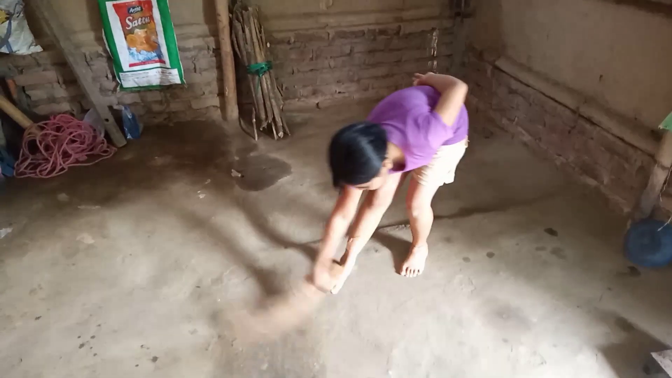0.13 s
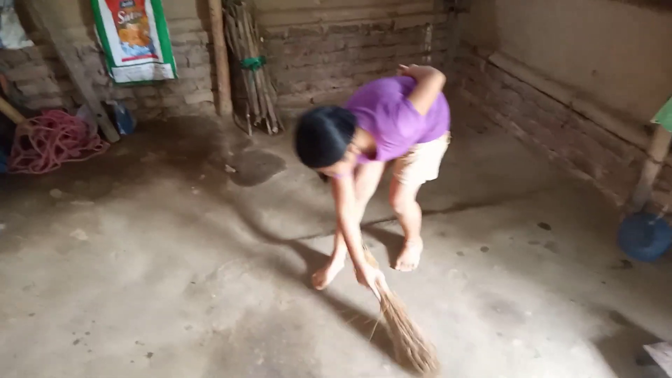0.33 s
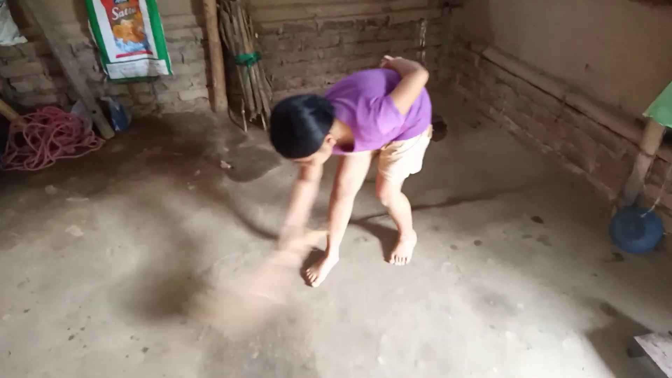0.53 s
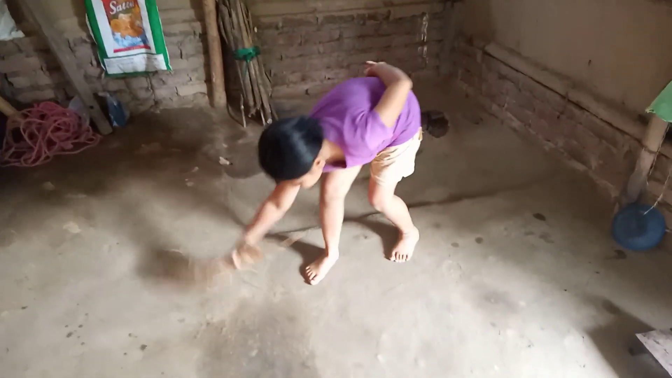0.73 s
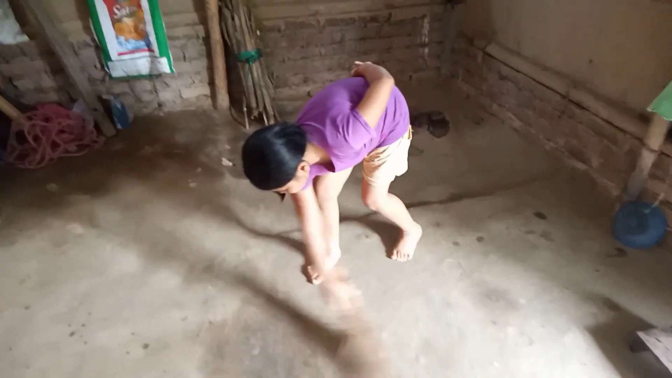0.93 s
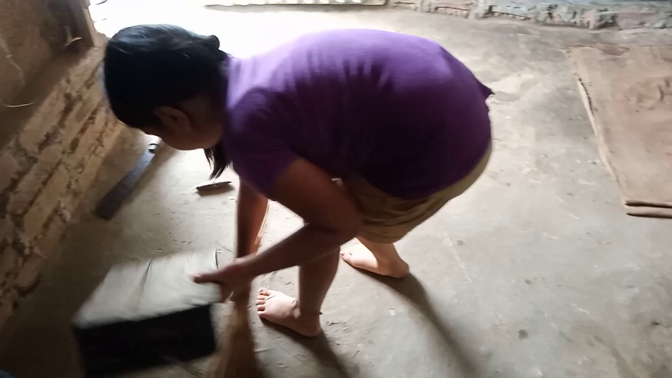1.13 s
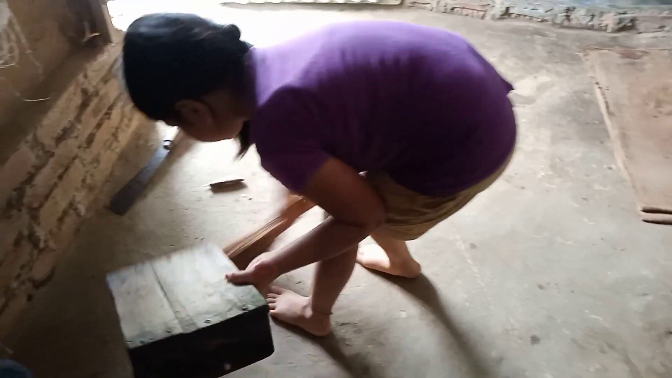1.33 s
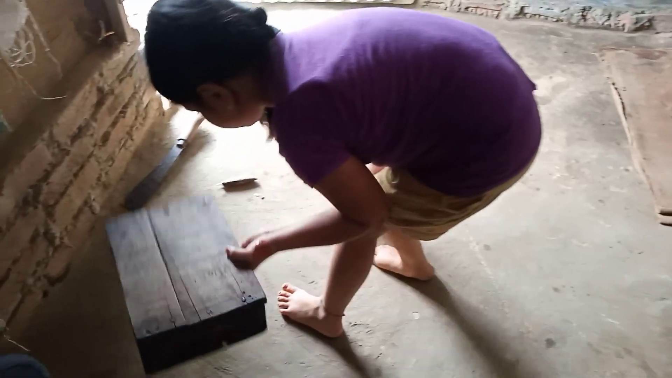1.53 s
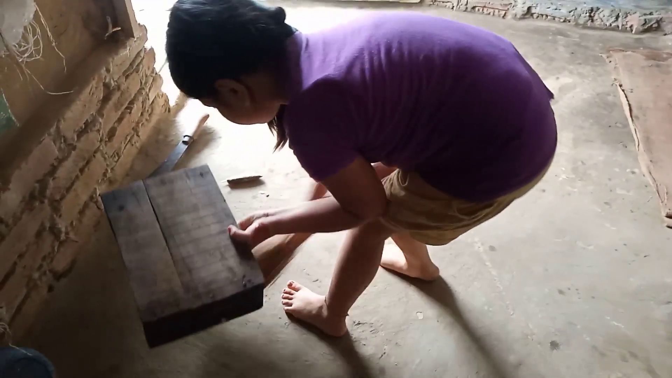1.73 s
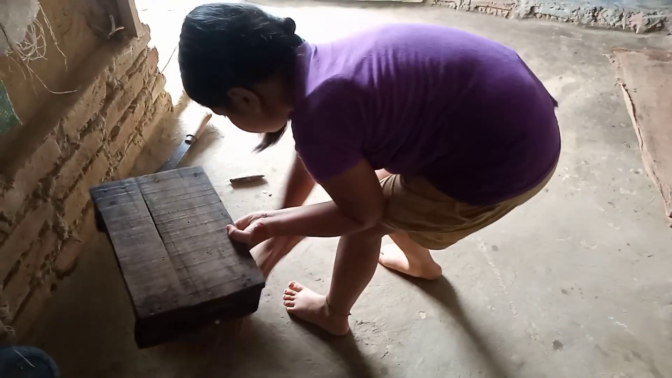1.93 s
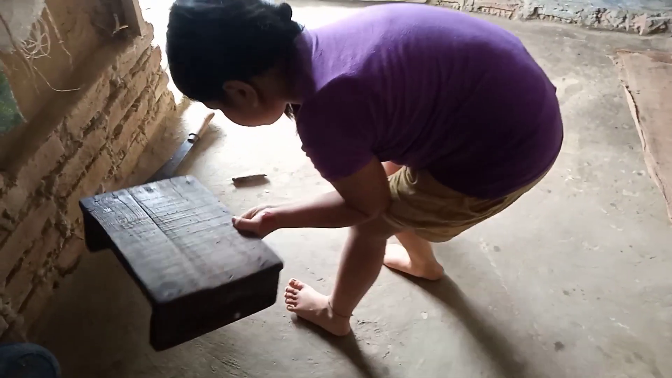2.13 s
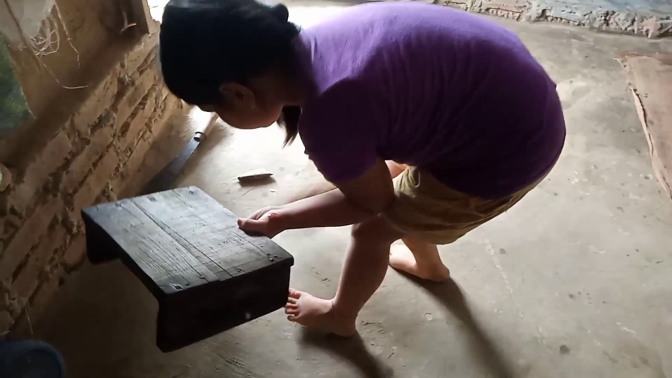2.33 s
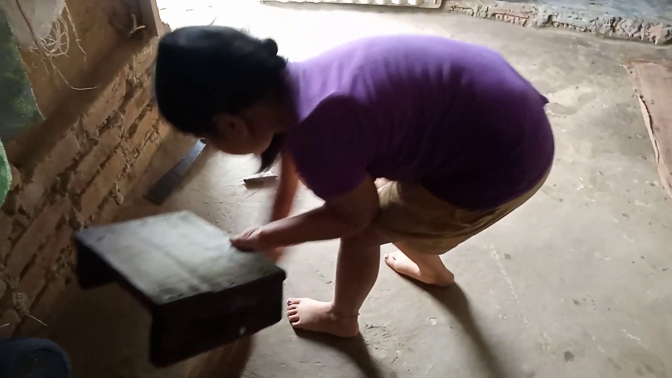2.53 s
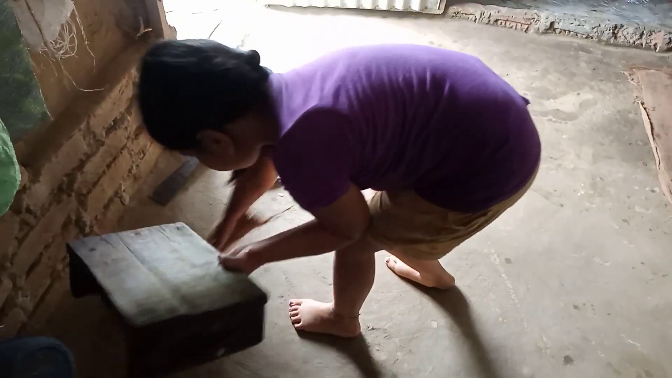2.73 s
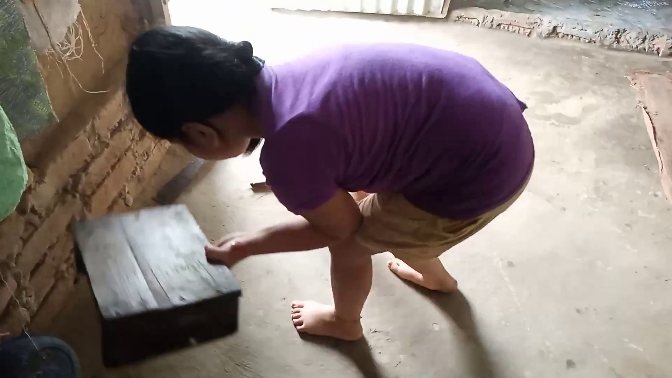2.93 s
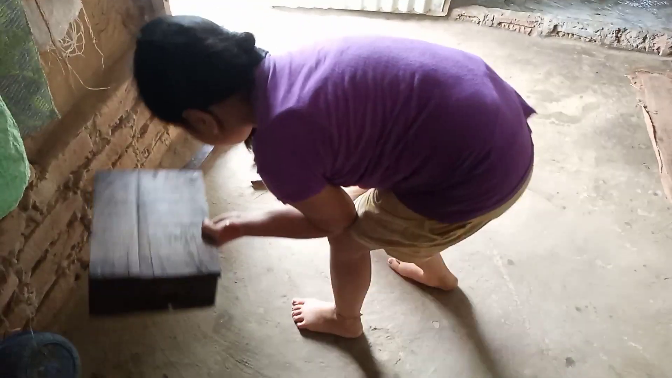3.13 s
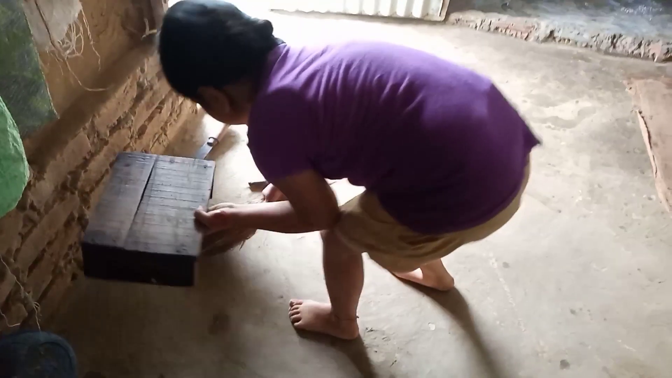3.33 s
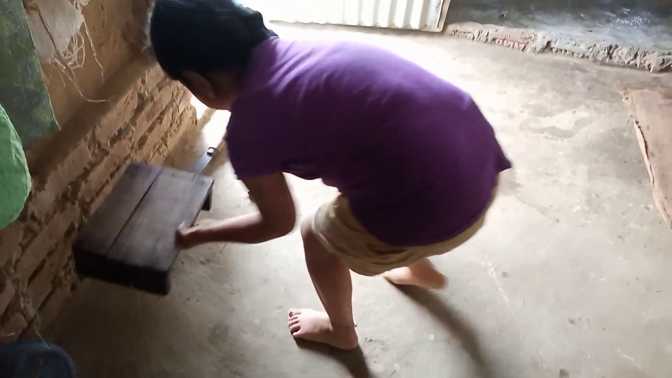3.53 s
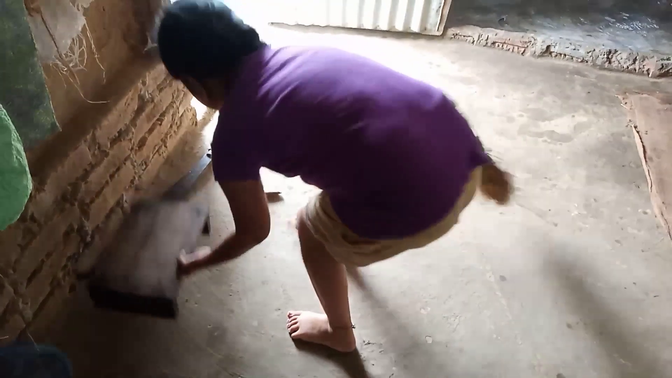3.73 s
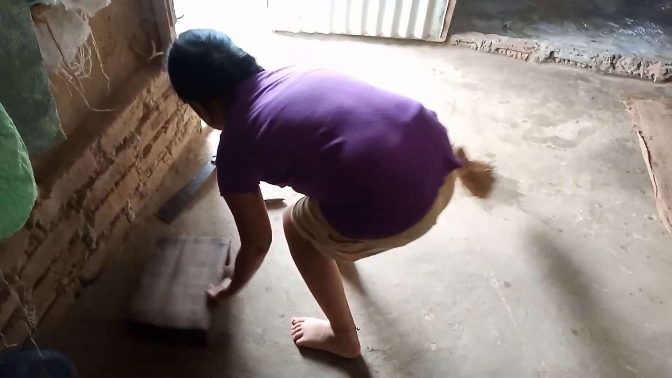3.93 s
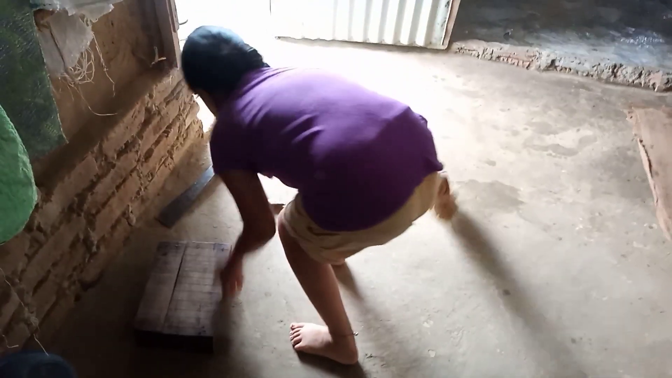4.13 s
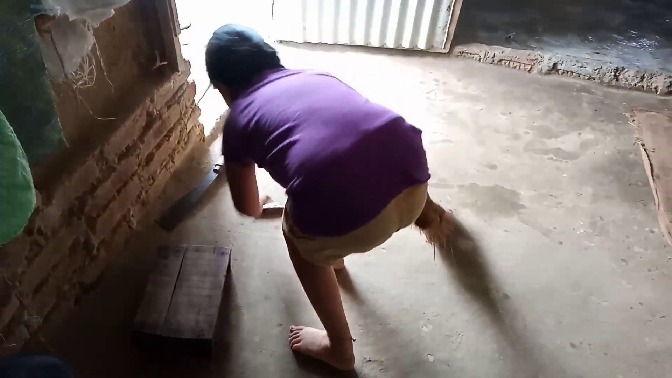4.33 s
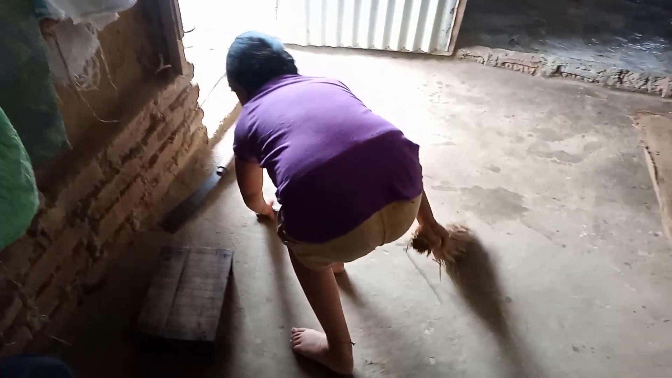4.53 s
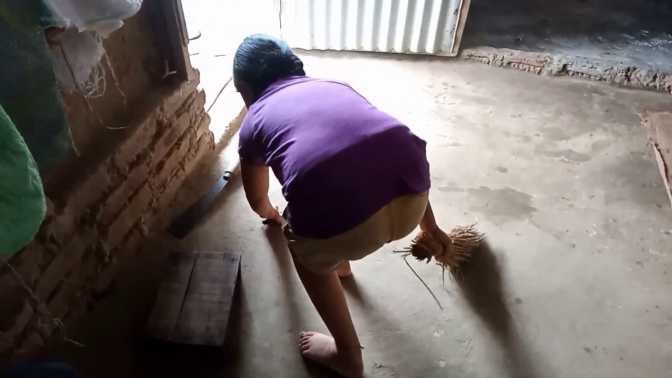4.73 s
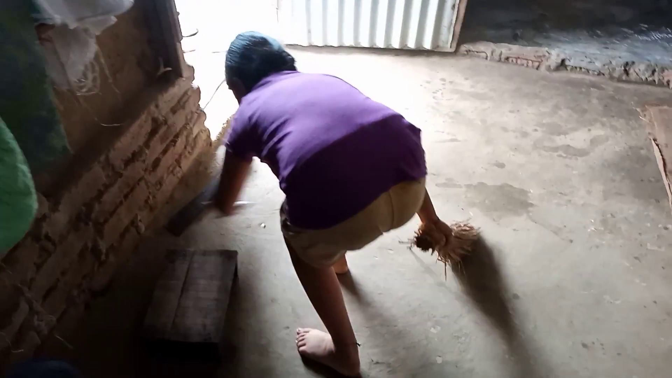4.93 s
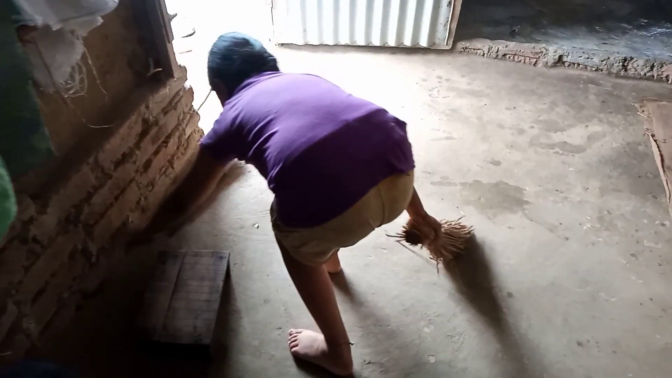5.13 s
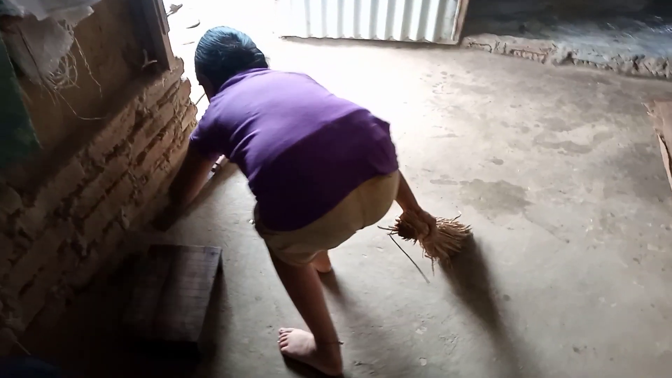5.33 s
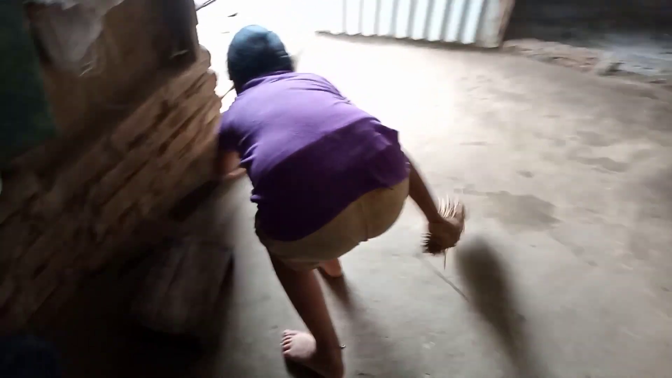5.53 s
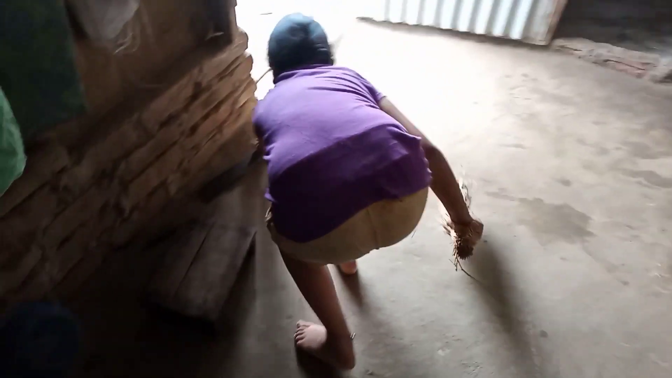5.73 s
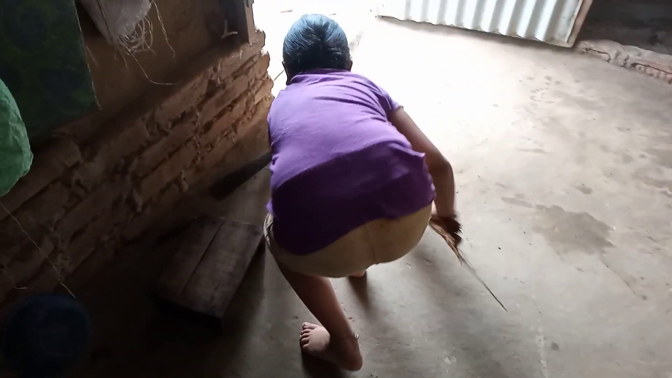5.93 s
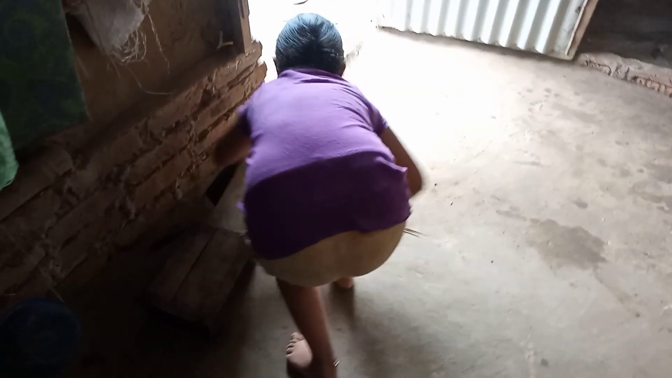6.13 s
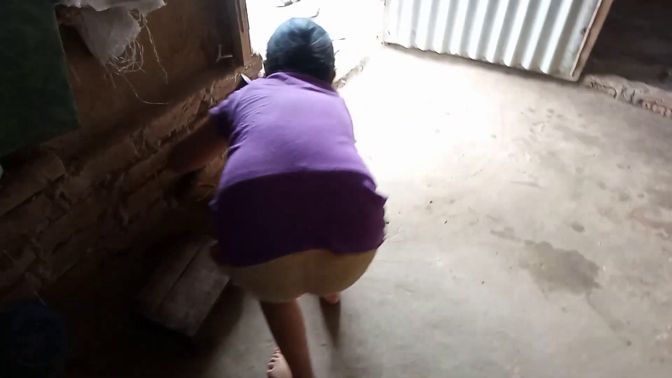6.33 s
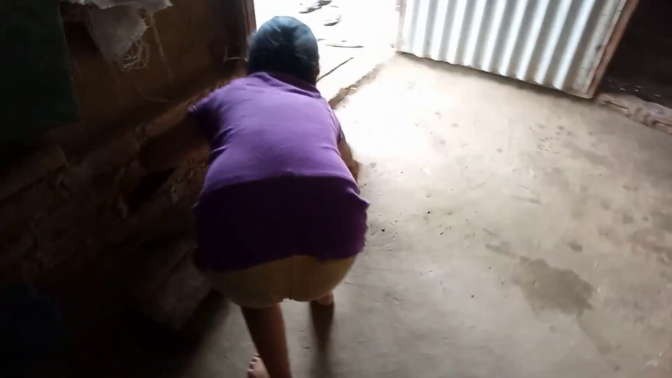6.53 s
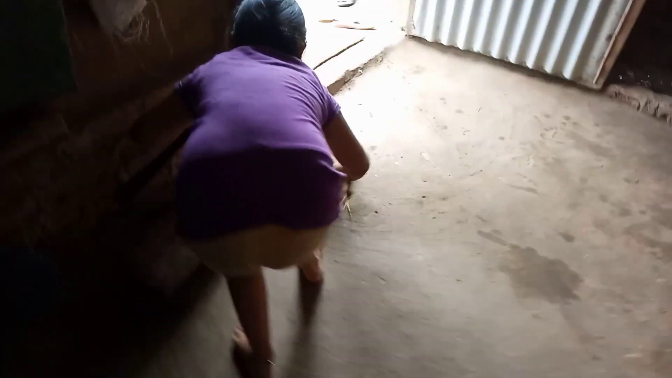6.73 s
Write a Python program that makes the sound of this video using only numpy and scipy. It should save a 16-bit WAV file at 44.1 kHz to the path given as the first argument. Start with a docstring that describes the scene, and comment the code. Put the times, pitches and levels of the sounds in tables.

```python
"""A short grass broom sweeps concrete in a small brick room: stalks slipping on grit, heard as dense random clicks.
Struck modes and filtered contacts give a wooden stool set down with a sharp double knock, bumps by the wall,
clicks and a clinking metal piece; bare feet shuffle in noise bursts and a sagging tone squeaks.
Gliding sines make a bird outside repeat three falling notes and fainter far calls, over coloured-noise air.
Early on the sound fades away, stays almost silent briefly and returns softer."""
import sys
import numpy as np
from scipy import signal
from scipy.fft import rfft, irfft
from scipy.io import wavfile
from scipy.ndimage import uniform_filter1d, map_coordinates

SR = 44100
rng = np.random.default_rng(int(sys.argv[2]) if len(sys.argv) > 2 else 0)


def wav_out(sig):
    """Save sig, one row per channel (or a flat mono array), as 16-bit PCM at SR to the path in sys.argv[1]."""
    wavfile.write(sys.argv[1], SR, np.round(np.clip(np.atleast_2d(sig).T, -1, 1) * 32767).astype(np.int16))


N = 303844
T = np.arange(N) / SR  # time [s]


def stalks(rate, spread_db):
    """Stick-slip friction: stalk tips slip on the grit in many tiny clicks and a few larger, rate per second."""
    slips = rng.random(N) < rate / SR
    sizes = undb(spread_db * np.minimum(rng.exponential(size=N), 5))
    return unit(slips * sizes * rng.standard_normal(N))


PRESS_POWER = 1.66  # the stalks bend softly at first, then bear down
SAG_DB_PER_S = 10  # the arm slows along the stroke
LIFT_DB, LIFT_POWER = 21.5, 1.44  # fall over the lift time [dB], faster as the last stalks leave


def pressure(s, press, hold, lift):
    """Contact force: the bundle is pressed down, drawn along while it slows, then lifted off."""
    drawn = np.maximum(T - s - press, 0)
    lifted = np.clip((drawn - hold) / lift, 0, 4)
    fall_db = SAG_DB_PER_S * np.minimum(drawn, hold) + LIFT_DB * lifted ** LIFT_POWER
    return np.clip((T - s) / press, 0, 1) ** PRESS_POWER * undb(-fall_db)


TIPS_DRIFT_DB, RASP_DRIFT_DB = 0.5, -10  # change of treble and of low rasp from touch to lift
# broom strokes and light grazes: (time [s], press [s], hold [s], lift [s], relative level [dB],
# mean treble against level [dB], mean low rasp against level [dB])
STROKES = [(0.0, 0.005, 0.098, 0.11, -57, -31, -5), (0.079, 0.11, 0.094, 0.22, -36.5, -17.5, -14.5),
           (0.498, 0.14, 0.099, .1, -58, -30, -25), (0.678, 0.054, .04, 0.13, -50.5, -21, -15),
           (0.763, 0.09, 0.11, 0.17, -38.5, -17, -11), (1.306, 0.055, .08, 0.15, -47.5, -27, -3),
           (1.389, 0.099, 0.046, 0.17, -42.5, -16.5, -3.5), (1.954, 0.021, .01, .12, -43, -19, -12),
           (2.017, 0.051, .11, 0.18, -40.5, -16.5, -12), (2.657, 0.065, .32, 0.18, -41, -16.5, -5.5),
           (3.144, 0.086, 0.012, 0.12, -52.5, -15, -30), (3.407, .035, 0.058, 0.15, -47, -21, -16.5),
           (3.465, 0.089, .03, 0.19, -44, -14.5, -30), (4.485, 0.081, 0.078, 0.24, -53.5, -27, -12),
           (5.293, 0.063, .12, 0.33, -65, -31, -8), (6.223, 0.28, 0.14, 0.21, -43.5, -17.5, 1.5)]
# colour of stalks on concrete: (frequency [Hz], level [dB])
STRAW = [(100, -18), (200, -21), (600, -16), (1000, -6.5), (1500, -5), (2300, -1), (3300, 0.5),
         (4150, -4.5), (4900, -13.5), (5600, -23.5), (6300, -16.5), (7400, -25.5), (10000, -32),
         (15500, -41.5)]


def broom(tip_rate=9000, flutter_db=0.7, body_db=2.0, tips_db=1.5, rasp_db=-6.0, grain_db=0.0):
    """Friction noise: the bundle rubs over concrete; fine tips add hiss and bent stalks a low rasp."""
    body = unit(colour(stalks(9000, grain_db), STRAW))
    hiss_colour = [(3000, -18.5), (5600, -2.5), (7400, 7.0), (10000, -12.5), (15500, -4.5)]
    hiss = unit(colour(stalks(tip_rate, 1.6), hiss_colour))
    rasp_colour = [(100, -17.0), (220, 8.0), (700, 7), (1100, 13), (2200, -36.5)]
    low_rasp = unit(colour(stalks(2500, 0.82), rasp_colour))
    power = np.zeros((3, N))  # overlapping strokes add in power
    for s, press, hold, lift, db, tips, rasp in STROKES:
        along = np.clip((T - s) / (press + hold + lift), 0, 1) - .5
        force = undb(db) * pressure(s, press, hold, lift)
        power[0] += force ** 2
        power[1] += (force * undb(tips + TIPS_DRIFT_DB * along)) ** 2
        power[2] += (force * undb(rasp + RASP_DRIFT_DB * along)) ** 2
    flutter = undb(flutter_db * walk(45))
    rub, fan, bend = np.sqrt(power) * flutter
    return undb(body_db) * rub * body + undb(tips_db) * fan * hiss + undb(rasp_db) * bend * low_rasp


# short scuffs of the bundle and of bare feet:
# (time [s], relative level [dB], rise constant [s], t60 [s], low-pass [Hz])
SCUFFS = [(1.611, -48, .005, 0.4, 598), (1.872, -52, 0.0086, .4, 800), (1.976, -46, .006, .26, 14000),
          (2.051, -30.5, 0.0016, 0.3, 2170), (3.84, -56.5, .006, 0.72, 652), (4.645, -50.5, 0.01, 1, 440),
          (4.815, -36, 0.0064, 0.61, 3600), (5.012, -39, .011, 0.52, 2090),
          (5.154, -35, 0.0039, 0.28, 2580), (5.345, -46, .003, .19, 9000), (5.671, -36.5, .003, 0.64, 3750),
          (6.267, -35, 0.0035, 0.35, 3860)]


def scuffs():
    """Transient friction: a jab or a shuffling foot gives a burst of slips that dies away exponentially."""
    out = np.zeros(N)
    grit_colour = [(80, -14), (200, -4.5), (800, 2.5), (1500, 0.5), (3700, 1.0),
                   (5400, -17.5), (7200, -10.5), (10000, -23), (15500, -39)]
    grit = colour(stalks(6000, 2.44), grit_colour)
    for s, db, rise, t60, hz in SCUFFS:
        out += undb(db) * burst(s, rise, t60) * unit(cut(grit, hz))
    return out


# stalks cracking while the bundle is worked along the wall
CRACKLE_FROM_S, CRACKLE_TO_S, CRACKLE_PER_S, CRACKLE_DB = 4.55, 5.8, 52, -65.5


def crackle():
    """Random impulses: single dry stalks and bits of debris snap at chance times."""
    active = 1. * ((T > CRACKLE_FROM_S) & (T < CRACKLE_TO_S))
    working = uniform_filter1d(active, size=4000)
    snaps = unit(colour(stalks(CRACKLE_PER_S, 1.5), STRAW))
    return undb(CRACKLE_DB) * working * snaps


# stool blows: (time [s], relative level [dB], contact low-pass [Hz], share of a flat landing [0-1])
STOOL_BLOWS = [(3.951, -21, 700, 0.16), (3.9621, -15, 556, 0), (4.039, -29.5, 250, 0.5),
               (4.059, -10, 1530, 0.95), (4.105, -27.5, 700, 1), (4.136, -26, 700, 1)]
# stool modes: (frequency [Hz], t60 before damping factor [s], struck on a corner [dB], landing flat [dB])
STOOL_MODES = [(119.8, 0.26, 0, 2), (146.6, 0.14, 5, -8.5), (187.4, 0.13, -6.5, 4), (253, 0.083, 3.5, 1),
               (298.5, 0.21, -15, -7), (375, 0.15, -35, -2.5), (434, 0.2, -13, -10), (493, 0.038, -26, -1),
               (536.6, 0.18, -29, 5.5), (584.6, 0.23, 0, -4.5), (628, 0.39, -9.5, -22), (650, .28, -23, -8),
               (726, 0.2, -24, -15), (778, 0.37, 4, -19), (873, 0.036, -22, -9.5), (990, 0.021, -32, -7),
               (1100, 0.037, -31, -23), (1480, 0.17, -31, -22), (1880, 0.14, -41, -22),
               (2630, .06, -49, -34), (3340, 0.033, -45, -34)]
# colour of wood on concrete: (frequency [Hz], level [dB])
CRACK = [(60, -26), (135, 2), (300, -2), (540, 4), (820, -8), (1020, -2), (1700, -14), (3300, -14),
         (5000, -30), (12000, -34)]


def stool(crack_db=-1, crack_t60=0.1, damping=0.81):
    """Modal excitation: a leg touches, the stool rocks, the boards land flat; each blow has its own brightness."""
    out = np.zeros(N)
    for s, db, hz, flat in STOOL_BLOWS:
        modes = [(f, corner + flat * (full - corner), t60 * damping)
                 for f, t60, corner, full in STOOL_MODES]
        boards = attack(ring(modes), 0)
        crack = attack(blow(crack_t60, CRACK, scatter_db=-5), crack_db)
        knock = cut(boards + crack, hz)
        add(out, s, attack(knock, db))
    return cut(out, 72, "high", order=4)


# dull bumps of feet and things by the wall:
# (time [s], relative level [dB], ring [Hz], thud low-pass [Hz])
BUMPS = [(0.015, -60.5, 302, 500), (1.868, -45.5, 702, 760), (2.05, -47, 630, 2200), (4.626, -46, 370, 450),
         (4.647, -41.5, 352, 587), (5.015, -42, 280, 700), (5.177, -36.5, 297, 900), (5.193, -34, 326, 700),
         (5.3, -28, 348, 1800), (5.317, -30.5, 451, 1500), (5.339, -25, 264, 2030), (5.354, -40, 193, 800),
         (5.438, -34, 268, 2200), (5.457, -31.5, 275, 2110), (5.562, -39.5, 298, 1300),
         (5.682, -40, 287, 1000), (5.969, -34, 197, 564), (6.12, -36, 190, 500), (6.235, -42.5, 297, 717),
         (6.287, -38, 390, 1000)]
# colour of the thud: (frequency [Hz], level [dB])
BUMP_BODY = [(45, -4.5), (85, -9), (130, 0), (400, 0), (650, -6), (1000, -2), (2000, -17.5), (4000, -10),
             (8000, -35)]


def bumps(thud_t60=0.038, ring_db=-7):
    """Heavily damped impact: a dull thud with one short hollow resonance."""
    out = np.zeros(N)
    for s, db, ring_hz, top_hz in BUMPS:
        thud = cut(blow(thud_t60, BUMP_BODY, scatter_db=8.5), top_hz)
        note = ring([(ring_hz, 0, .1)])
        add(out, s, attack(attack(thud, 0) + attack(note, ring_db), db))
    return cut(out, 120, "high")


# hard clicks and taps of things handled near the wall:
# (time [s], relative tick level [dB], ring [Hz], relative ring level [dB], ring t60 [s])
CLICKS = [(1.453, -49, 1040, -40.5, .03), (2.048, -59, 743, -36.5, 0.1), (2.051, -59, 1263, -35.5, 0.042),
          (4.645, -42.5, 6870, -59, 0.057), (5.285, -37.5, 2330, -38.5, 0.1),
          (5.287, -38, 10100, -52.5, 0.064), (5.312, -42, 2780, -34.5, 0.06), (5.317, -32, 2333, -33, 0.09),
          (5.341, -25.5, 6800, -34.5, 0.015)]
# colour of the tick: (frequency [Hz], level [dB])
TICK = [(60, -27), (150, 3), (500, -5), (1500, 5), (3500, -2), (5500, -14.5), (6900, -3), (10000, -28.5),
        (15500, -24)]


def clicks(tick_t60=0.016):
    """Hard impact: each small contact excites one choked resonance."""
    out = np.zeros(N)
    for s, db, ring_hz, ring_db, t60 in CLICKS:
        tick = attack(blow(tick_t60, TICK, scatter_db=13), db)
        note = attack(ring([(ring_hz, 0, t60)]), ring_db)
        add(out, s, tick + note)
    return cut(out, 77, "high")


# the metal piece falls and bounces once: (time [s], relative level [dB])
METAL_BLOWS = [(6.459, -21), (6.5, -35)]
# modes of the metal piece: (frequency [Hz], level [dB], t60 [s])
METAL_MODES = [(310, -11, 0.053), (616, -4.5, 0.25), (1400, -10, 0.12), (2010, -7.5, 0.05),
               (2294, -3, 0.14), (2760, -16, 0.095), (3360, -16, 0.074), (3640, -7, 0.031),
               (4880, -25, 0.17), (6730, -18.5, 0.047), (8200, -16.5, 0.19), (10600, -39, .1),
               (11500, -24, 0.057), (13000, -37, 0.092)]
# colour of metal on concrete: (frequency [Hz], level [dB])
CLASH = [(70, -12), (200, 4.5), (600, 3.5), (1100, -3), (3600, -5), (5400, -27), (7000, -25), (9500, -44),
         (15500, -32)]


def metal(clash_t60=0.11, clash_db=-5):
    """Modal impact: a metal piece strikes the concrete, chatters and rings briefly."""
    out = np.zeros(N)
    for s, db in METAL_BLOWS:
        clash = attack(blow(clash_t60, CLASH, scatter_db=10.5), db + clash_db)
        add(out, s, attack(ring(METAL_MODES), db) + clash)
    return out


# a short hollow squeak
SQUEAK_S, SQUEAK_RISE_S, SQUEAK_T60_S, SQUEAK_DB = 5.027, 0.0079, 0.26, -25.5
SQUEAK_HZ, SQUEAK_SAG_HZ_PER_S = 924, 116


def squeak(rough=0.19):
    """Stick-slip oscillation: a short sagging note whose strength shakes quickly."""
    hz = SQUEAK_HZ - SQUEAK_SAG_HZ_PER_S * np.clip(T - SQUEAK_S, 0, SQUEAK_T60_S)
    note = tone(hz, waver=0.0083, flutter_db=1.5)
    shake = 1 + rough * walk(160)
    envelope = undb(SQUEAK_DB) * burst(SQUEAK_S, SQUEAK_RISE_S, SQUEAK_T60_S)
    return envelope * note * shake


# bird phrases: (time [s], relative level [dB])
PHRASES = [(1.387, -40), (2.076, -38), (2.829, -38.5), (3.592, -38.5), (4.333, -37.5), (5.068, -40),
           (5.954, -38.5), (6.680, -36.5)]
# notes of a phrase: (delay [s], length [s], nominal start [Hz], nominal end [Hz], level in phrase [dB])
NOTES = [(-.006, 0.034, 1537, 859, -2), (0.063, 0.0336, 1406, 857, 1), (0.136, 0.0285, 1370, 950, 2.5)]


def birds(echo_s=0.021, echo_db=-7):
    """Frequency glide and echo: three quick falling whistles a phrase and far calls, thrown back by a wall."""
    out = far_calls()
    for s, db in PHRASES:
        for delay, length, start_hz, end_hz, note_db in NOTES:
            u = np.linspace(0, 1, int(length * SR))
            glide_hz = end_hz + (start_hz - end_hz) * (1 - u) ** 1.786
            hz = glide_hz * (1 + 0.016 * rng.standard_normal())  # each note slightly off pitch
            whistle = np.sin(np.pi * u) * np.sin(2 * np.pi * np.cumsum(hz) / SR)
            add(out, s + delay, undb(db + note_db) * whistle)
    return out + undb(echo_db) * np.interp(T - echo_s, T, out)


CALL_EDGE_S = 0.012  # fade at either end
# far calls of fowl and other birds: (time [s], length [s], start [Hz], end [Hz],
# arch [Hz], relative start level [dB], relative end level [dB])
FAR_CALLS = [(4.714, 1, 2103, 2130, 60.5, -58, -56.5), (4.896, .1, 798, 797, -8, -46.5, -42),
             (6.777, .13, 1934, 2670, -3, -48, -46)]


def far_calls():
    """Frequency modulation: thin wavering calls whose pitch glides over a shallow arch."""
    out = np.zeros(N)
    for s, length, start_hz, end_hz, arch_hz, start_db, end_db in FAR_CALLS:
        u = np.clip((T - s) / length, 0, 1)
        hz = start_hz + (end_hz - start_hz) * u + arch_hz * np.sin(np.pi * u)
        edges = np.minimum(np.minimum(u, 1 - u) * length / CALL_EDGE_S, 1)
        level = undb(start_db + (end_db - start_db) * u)
        out += edges * level * tone(hz, waver=0.01785, flutter_db=4.0)
    return out


AIR_DB = -52.5
# background colour: (frequency [Hz], level [dB])
AIR = [(25, -15), (45, -15), (72, 0), (110, -4.5), (200, -15), (330, -28), (650, -33.5), (1100, -11),
       (1500, -14), (2200, -15.5), (3600, -15), (5300, -28), (7200, -24.5), (10000, -40.5), (15500, -46.5)]
# background swell: (time [s], low rumble [dB], outdoor hiss [dB])
SWELL = [(0, 6.5, -4.5), (.9, -0.5, -13), (1.4, -5.5, 2), (2.2, 3.5, 0), (3.4, 2, 2), (4.6, 2, 3.5),
         (6.89, 1.5, 4)]


def air(flutter_db=1.5):
    """Broadband noise: slowly swelling outdoor hiss over an uneven low rumble."""
    low, high = (colour(rng.standard_normal(N), AIR) for _ in range(2))
    rumble_db, hiss_db = curve(SWELL)
    rumble = cut(low, 130) * undb(rumble_db + flutter_db * walk(7.9))
    hiss = cut(high, 130, "high") * undb(hiss_db)
    return undb(AIR_DB) * unit(rumble + hiss)


# first reflections from floor and walls: (time [s], level against direct sound [dB])
REFLECTIONS = [(.0062, -18.5), (0.0119, -15), (0.024, -22), (.044, -17.5)]


def room(x, tail_db, t60_low=0.64, t60_high=0.13, build_s=0.0046):
    """Reverberation: direct sound, a few wall reflections and a diffuse tail whose treble dies first."""
    noise = rng.standard_normal(SR)
    low_tail = cut(noise, 2700, order=1) * fade(t60_low)
    high_tail = cut(noise, 1900, "high", order=1) * fade(t60_high)
    tail = (low_tail + high_tail) * (1 - np.exp(-T[:SR] / build_s))
    response = undb(tail_db) * tail / np.sqrt(np.sum(tail ** 2))
    response[0] += 1
    for s, db in REFLECTIONS:
        response[int(s * SR)] += undb(db)
    return signal.fftconvolve(x, response / np.sqrt(np.sum(response ** 2)))[:N]


def blow(t60, points, scatter_db):
    """Impact: one sharp push and a short scatter of smaller ones, with a (Hz, dB) colour."""
    scatter = rng.standard_normal(SR) * fade(t60)
    push = undb(scatter_db) * scatter / np.sqrt(np.sum(scatter ** 2))
    push[0] += 1
    return colour(push, points)


def ring(modes):
    """Modal superposition: decaying sines (Hz, dB, t60 s) that alternate in sign."""
    return sum((-1) ** k * undb(db) * fade(t60) * np.sin(2 * np.pi * hz * T[:SR])
               for k, (hz, db, t60) in enumerate(modes))


def tone(hz, waver, flutter_db):
    """Phase integration: a wavering whistle along a pitch curve."""
    phase = np.cumsum(hz * (1 + waver * walk(70))) / SR
    return undb(flutter_db * walk(30)) * np.sin(2 * np.pi * phase)


def burst(s, rise, t60):
    """Exponential growth and decay: a quick swell to a peak at time s, then a fall of 60 dB in t60."""
    return np.exp(np.minimum((T - s) / rise, -np.log(1000) * (T - s) / t60))


def fade(t60):
    """Exponential damping: one second of decay, 60 dB in t60."""
    return np.exp(-np.log(1000) * T[:SR] / max(t60, 1e-3))


def walk(rate):
    """Random modulation: smooth chance that changes about rate times a second."""
    knots = rng.standard_normal(2048)
    return map_coordinates(knots, [T * rate], order=2, mode="mirror")


def curve(rows):
    """Linear interpolation: each column of a table joined by straight lines in time."""
    s, *columns = np.transpose(rows)
    return [np.interp(T, s, c) for c in columns]


def colour(x, points):
    """Minimum-phase filtering: a causal (Hz, dB) response built from the folded cepstrum."""
    size = 8192
    hz, db = np.transpose(points)
    f = np.fft.rfftfreq(size, 1 / SR)
    cepstrum = irfft(np.log(undb(np.interp(np.log(f + 1), np.log(hz), db))))
    cepstrum[1:size // 2] *= 2
    cepstrum[size // 2 + 1:] = 0
    response = irfft(np.exp(rfft(cepstrum)))[:size // 2]
    return signal.fftconvolve(x, response)[:len(x)]


def cut(x, hz, kind="low", order=2):
    """Butterworth filtering: low-pass or high-pass."""
    return signal.sosfilt(signal.butter(order, min(hz, SR / 2 - 1000), kind, fs=SR, output="sos"), x)


def undb(db):
    """Logarithmic level: decibels to amplitude gain."""
    return 10 ** (np.asarray(db) / 20)


def unit(x):
    """Mean-square level: scale to rms 1."""
    return x / np.sqrt(np.mean(x ** 2) + 1e-18)


def attack(x, db):
    """Onset level: set the rms of the first 10 ms of a blow."""
    return x * undb(db) / np.sqrt(np.mean(x[:SR // 100] ** 2))


def add(out, s, x):
    """Superposition: mix a sound in at its time."""
    i = int(s * SR)
    out[i:i + len(x)] += x[:N - i]


def scene():
    """Superposition: work on the floor is near; the birds come through the doorway with more echo."""
    sweeping = room(broom() + scuffs() + crackle(), tail_db=-13.5)
    handling = room(bumps() + clicks() + metal() + squeak(), tail_db=-6.0, t60_low=0.36)
    knocks = room(stool(), tail_db=-12, t60_low=.42, t60_high=.28)
    outside = room(birds(), tail_db=-5, t60_low=.6)
    mix = sweeping + undb(0.5) * handling + undb(-1.0) * knocks + undb(0.5) * outside + air()
    return mix[None]


# the break: the sound fades away, stays almost silent and returns
FADE_S, SILENT_S, RETURN_S = 1.045, 1.158, 1.308
FADE_DB_PER_S, RETURN_RISE_S, SILENT_DB = 125, 0.038, -74.5
AFTER_DB = -3  # everything is softer after the break
TOP_HZ = 15600


def record(dry):
    """Gain and band limiting: the sound fades out, returns softer; the deep bass and the top are cut."""
    before = undb(-FADE_DB_PER_S * np.maximum(T - FADE_S, 0)) * (T < SILENT_S)
    after = undb(AFTER_DB) * np.clip((T - RETURN_S) / RETURN_RISE_S, 0, 1)
    gain = before + after + undb(SILENT_DB)
    top_cut = signal.ellip(10, .2, 70, TOP_HZ, fs=SR, output="sos")  # 0.2 dB ripple, 70 dB stop band
    return signal.sosfilt(top_cut, cut(dry * gain, 35, "high"))


dry = scene()
out = record(dry)
wav_out(out)
```